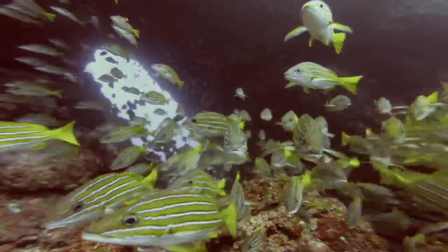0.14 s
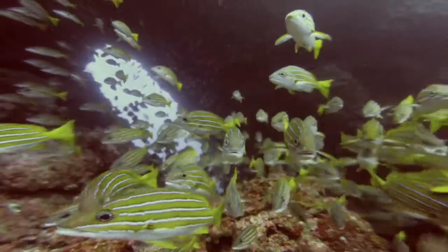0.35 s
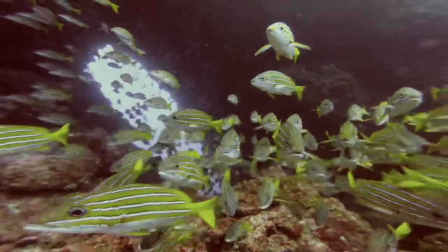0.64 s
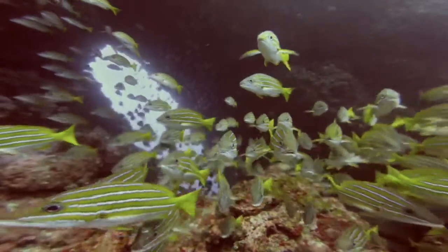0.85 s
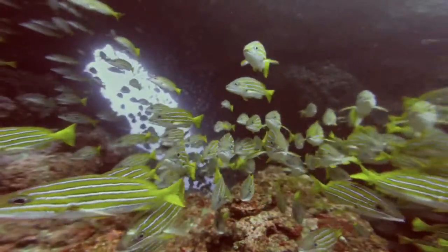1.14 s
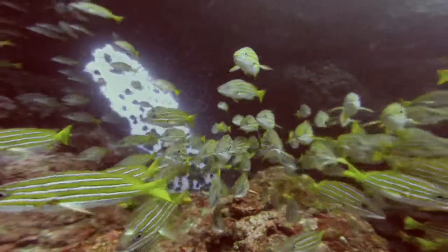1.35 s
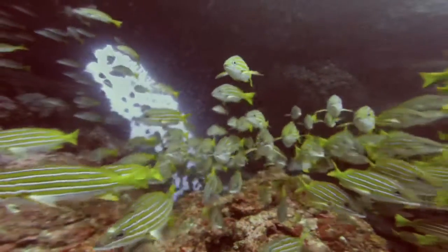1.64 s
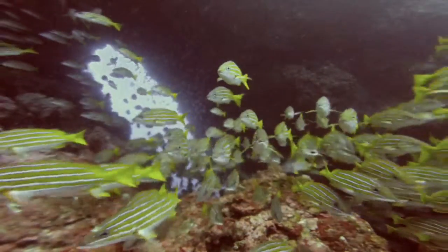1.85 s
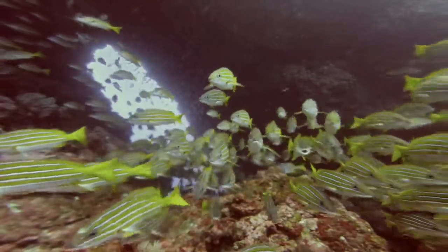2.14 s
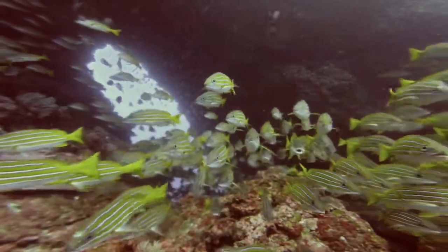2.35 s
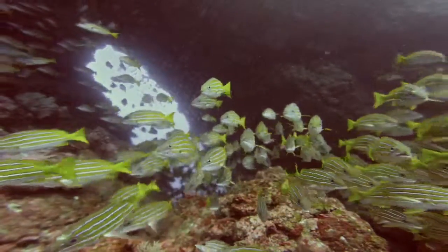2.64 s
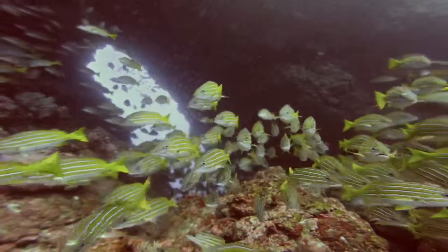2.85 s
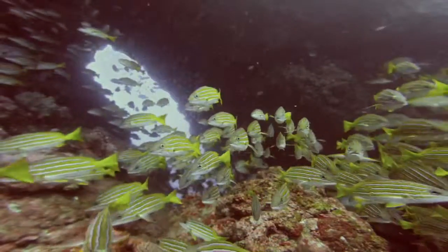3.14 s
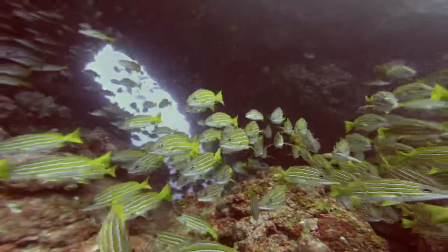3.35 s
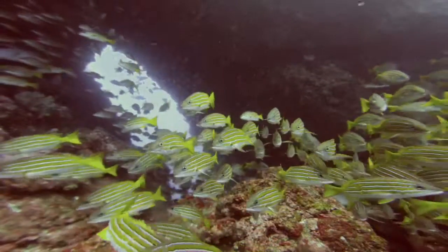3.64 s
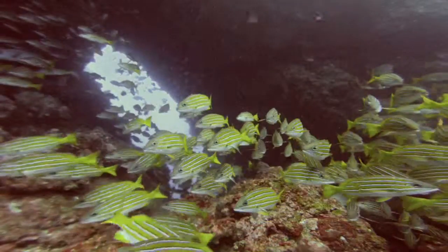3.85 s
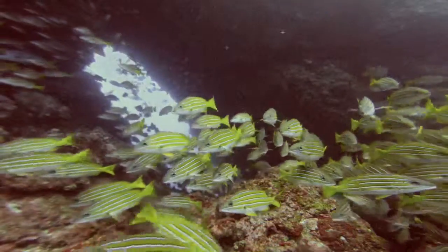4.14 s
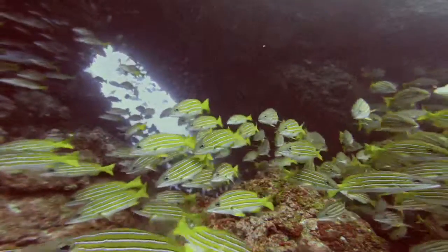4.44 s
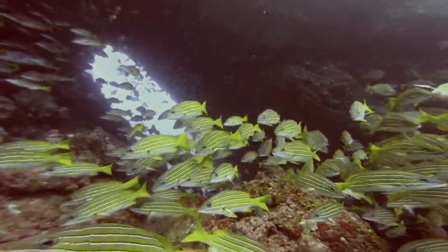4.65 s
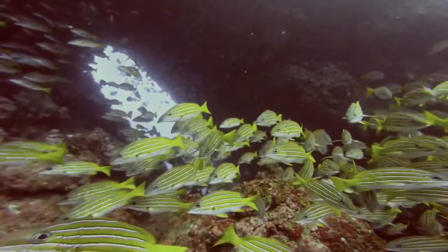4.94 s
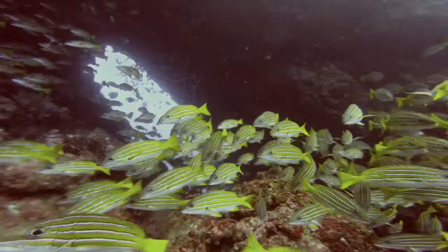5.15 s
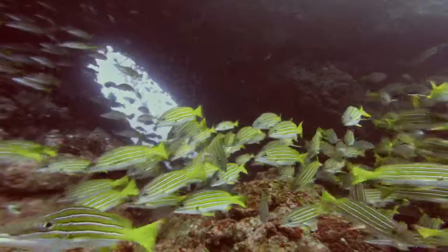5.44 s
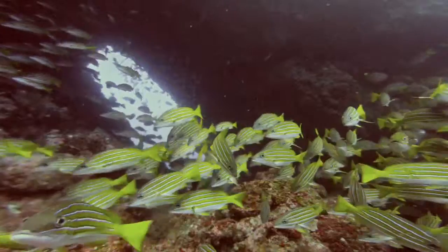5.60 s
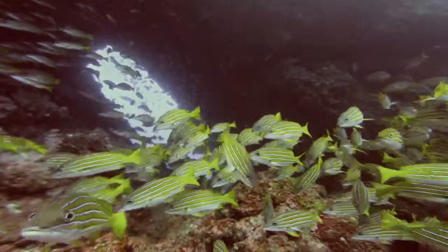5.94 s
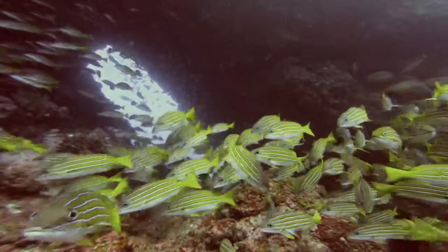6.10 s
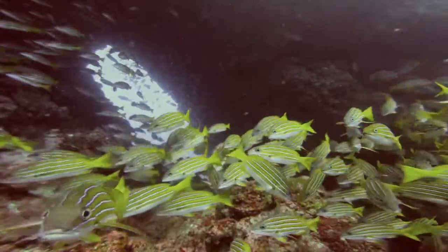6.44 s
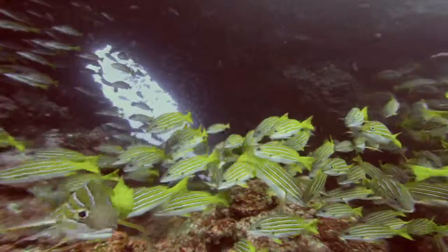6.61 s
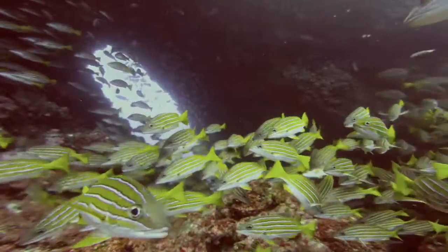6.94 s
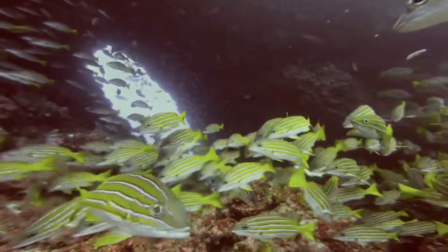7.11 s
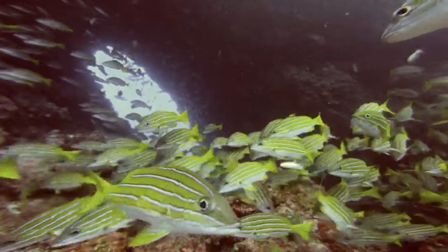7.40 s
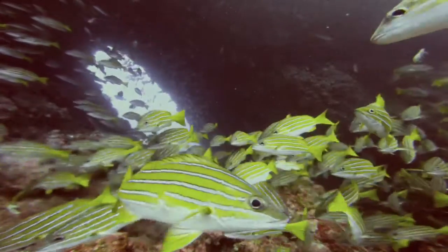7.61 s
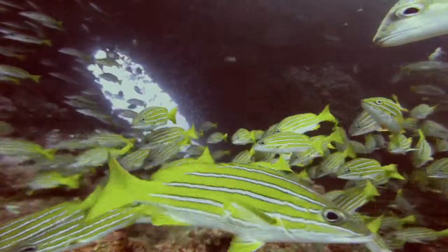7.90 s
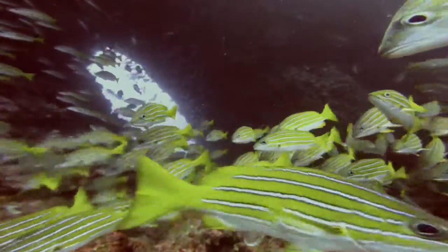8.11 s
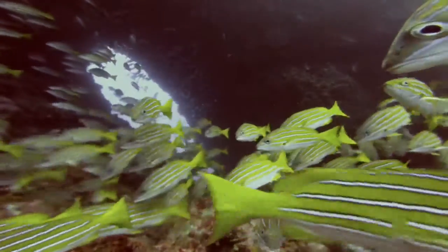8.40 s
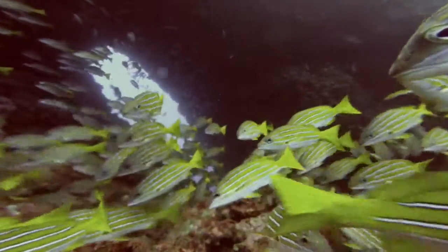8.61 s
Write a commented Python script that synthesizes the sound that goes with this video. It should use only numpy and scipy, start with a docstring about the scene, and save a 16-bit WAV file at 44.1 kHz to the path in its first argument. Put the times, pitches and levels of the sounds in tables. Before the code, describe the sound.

Underwater on a rocky reef amid a school of striped fish, snapping shrimp crackle without pause, near snaps sharp and bright over a fainter, finer far crackle. Dull hollow knocks and tiny low grunts mingle in the first three seconds. A heavy low thump strikes the camera housing just before five seconds, then a cluster of bumps shortly after seven. Close stereo, sealed in a housing, with short rock echoes.

```python
"""A sealed camera housing sits on a reef among a school of fish, heard in stereo.
From the start a faint lumpy hush and short low grunts of filtered noise lie under random far shrimp snaps.
Dull two-pitched knocks and near snaps soon join: noise bursts that ring the housing and echo off the rock.
Slow pushes of water swell as low noise at 0.7 s and 6 s.
Heavy bumps at 4.8 s and from 7.3 s ring the low modes of housing and mount."""
import sys
import numpy as np
from scipy import signal
from scipy.fft import rfft, irfft
from scipy.io import wavfile
from scipy.ndimage import uniform_filter1d

SR = 44100
rng = np.random.default_rng(int(sys.argv[2]) if len(sys.argv) > 2 else 0)


def boost(x):
    """Linear amplitude factor 10**(x/20) for a level x in decibels (scalar or array-like)."""
    u = np.asarray(x, float) / 20
    return 10 ** u


def put_to_file(sound):
    """Save the sound as 16-bit audio at rate SR, in the file named by the first command-line argument."""
    columns = np.atleast_2d(sound).T  # one column per channel
    safe = np.clip(columns, -1, 1)
    whole_steps = np.round(safe * 32767)
    wavfile.write(sys.argv[1], SR, whole_steps.astype(np.int16))


N = 386316  # samples

# colour of the water's hush, relative: f/Hz, level/dB
HUSH_COLOUR = [(165, -7), (500, -28.5), (900, -9), (1500, -24.5)]
# short low grunts: t/s, peak level before the lean to one side/dB, pitch f/Hz
LOW_GRUNTS = [(0, -42, 160), (0.084, -46.5, 274), (0.307, -42, 257), (0.666, -44, 298), (0.912, -38, 172),
              (1.264, -40, 302), (1.569, -44.5, 294), (2.198, -44.5, 304), (2.638, -46, 280)]
# base level of the far snaps, before the answer to near sounds: t/s, level/dB
FAR_LEVEL = [(0.0, -35), (0.799, -36), (2.95, -41.5), (3.499, -36.5), (5.751, -40), (7.299, -39),
             (7.56, -48.5), (7.849, -40.5)]
# dull knocks: t/s, peak level of the ping/dB
DULL_KNOCKS = [(0.074, -29), (0.299, -25.5), (0.597, -40.5), (0.621, -41), (0.656, -23), (0.948, -37),
               (0.975, -10.5), (1.041, -15), (1.151, -37), (1.256, -22), (1.399, -36), (1.56, -24),
               (2.186, -30), (2.217, -24), (2.277, -16.5), (2.34, -33), (2.628, -31), (3.969, -37),
               (4.092, -36), (4.149, -33.5), (5.683, -43.5), (6.377, -44), (6.534, -39.5), (6.857, -39.5),
               (6.881, -39), (6.926, -37.5), (6.95, -39), (7.94, -47.5), (8.136, -45), (8.32, -39)]
# the two pitches of a knock, relative: f/Hz, fall by 60 dB t/s, left level/dB, right level/dB
KNOCK_PITCHES = [(906.4, 0.026, 7.5, -17.5), (1379, 0.011, -5, 0)]
# near shrimp snaps: t/s, peak level/dB, centre of the colour f/Hz
NEAR_SNAPS = [(0.1263, -11.5, 6200), (0.1574, -12, 6460), (0.1901, -7, 4960), (0.241, -11.5, 5530),
              (0.272, -11, 3230.0), (0.2811, -15.5, 7200), (0.3211, -13.5, 2700), (0.3491, -18.5, 2600.0),
              (0.377, -20.5, 7500.0), (0.3901, -8, 3785), (0.4156, -9, 3500.0), (0.4293, -6, 5560.0),
              (0.5043, -4, 2270), (0.5595, -19, 2470), (0.5825, -15, 6700), (0.6367, -27.5, 4400),
              (0.6474, -19.5, 6850), (0.8583, -15, 7400.0), (0.8933, -19.5, 2600.0), (0.9543, -8.5, 7600),
              (0.9923, -10.5, 4670.0), (1.0009, -9, 2520), (1.0218, -13.5, 4440), (1.14, -23, 6300.0),
              (1.157, -6, 4480), (1.1798, -13.5, 1970), (1.2039, -7, 4900.0), (1.272, -1, 2260),
              (1.3207, -4, 4550), (1.3998, -13, 1910), (1.4814, -14.5, 8200), (1.5222, -9, 3010.0),
              (1.5645, -5, 6750), (1.5842, -8, 6200), (1.6227, -17, 8800), (1.6701, -8, 5140),
              (1.6977, -11.5, 2990), (1.716, -12.5, 6000.0), (1.7518, -4.5, 2990.0), (1.7597, -9, 7500),
              (1.8108, -19, 5370), (1.8705, -17.5, 7300), (1.9015, -7, 4420), (1.95, -3, 2840),
              (1.9793, -16.5, 2590), (2.005, -10, 3750.0), (2.0226, -11, 3540.0), (2.078, -7, 5870),
              (2.151, -27, 8150.0), (2.2363, -14.5, 4800), (2.2631, -3.5, 2615), (2.2758, -5.5, 2180),
              (2.287, -7.5, 5330), (2.353, -9, 7830.0), (2.3652, -7.5, 3100), (2.4194, -17.5, 3630),
              (2.5182, -11.5, 7200), (2.5758, -13, 3810.0), (2.5893, -4.5, 3400.0), (2.6098, -6.5, 6140.0),
              (2.6543, -6.5, 2940), (2.7158, -20, 3200), (2.8236, -13.5, 7700), (2.8556, -12, 9050),
              (3.025, -12, 3230), (3.0432, -15.5, 5700), (3.0989, -21.5, 6200.0), (3.111, -5.5, 2680.0),
              (3.1264, -6.5, 5650), (3.164, -13.5, 5730), (3.1843, -9.5, 4580.0), (3.194, -3.5, 2980.0),
              (3.2109, -8, 6100), (3.256, -5.5, 3200), (3.2824, -1, 2750), (3.3971, -12, 4550),
              (3.4046, -12.5, 7800), (3.4604, -11, 7200), (3.538, -12, 6350.0), (3.577, -8, 3800.0),
              (3.6065, -12.5, 6800), (3.6265, -5, 4270.0), (3.6985, -16, 7500), (3.7234, -6, 4830),
              (3.7883, -17, 5000.0), (3.8594, -2, 2386), (3.8985, -20, 2550), (3.9105, -13, 7900),
              (3.939, -9, 3900), (3.9898, -6.5, 4520), (4.027, -20, 7700), (4.038, -9, 4570),
              (4.1068, -14.5, 7800), (4.1144, -17.5, 7500), (4.2338, -16.5, 6500), (4.3007, -18, 4720),
              (4.349, -14.5, 6600), (4.3626, -11.5, 8700), (4.374, -1.5, 3400.0), (4.389, -11, 2650),
              (4.4296, -17.5, 6060), (4.4376, -8, 3540), (4.4695, -3, 3060), (4.544, -13.5, 6500),
              (4.6909, -21, 2570.0), (4.715, -9.5, 6490.0), (4.938, -15, 8000), (4.9699, -3.5, 2680.0),
              (5.1146, -17, 3080), (5.135, -8, 4300.0), (5.1634, -14, 6920.0), (5.1825, -17, 2960.0),
              (5.194, -13.5, 2990.0), (5.2358, -7, 3630), (5.2537, -11.5, 4320.0), (5.305, -19, 6160.0),
              (5.3709, -16.5, 2800), (5.4231, -4, 3770), (5.4392, -15.5, 3470), (5.4967, -18.5, 6030),
              (5.5512, -14.5, 7310.0), (5.566, -7.5, 6650), (5.5871, -13.5, 6140), (5.6241, -5, 3530),
              (5.834, -15.5, 4300), (5.8625, -13.5, 5600), (5.8739, -2, 3950), (5.9338, -23.5, 3300.0),
              (5.9502, -11, 8380.0), (6.0257, -11.5, 4050), (6.069, -16, 5200), (6.106, -21, 3080),
              (6.174, -2.5, 2590), (6.2009, -4, 3060), (6.2635, -3, 4400), (6.2955, -9.5, 3100),
              (6.4079, -19, 3120), (6.4312, -9, 4330.0), (6.4423, -8.5, 3770), (6.5069, -7, 4990.0),
              (6.5345, -15, 8800), (6.5542, -5.5, 2580), (6.6267, -14, 6000), (6.6725, -4, 2560),
              (6.7273, -15, 2580), (6.8671, -9, 3780), (6.95, -13.5, 4660), (7.0312, -14, 6940.0),
              (7.0389, -13.5, 4130), (7.0646, -5.5, 3230), (7.084, -10, 3000.0), (7.1126, -10, 3090),
              (7.153, -13.5, 7000), (7.173, 0, 2680), (7.23, -18, 4500.0), (7.2481, -9.5, 3270.0),
              (7.2684, -2.5, 2920), (7.2863, -8.5, 8270), (7.339, -7.5, 6250), (7.3658, -13.5, 2230),
              (7.4206, -15, 3274), (7.6499, -18.5, 3250), (7.6764, -20.5, 3045), (7.75, -19, 7310),
              (7.9248, -6, 4600), (7.942, -16, 6160), (8.0637, -15, 2260), (8.1508, -21, 5900),
              (8.2127, -16, 8500), (8.2503, -2, 3870), (8.2988, -9.5, 3080), (8.3273, -16, 6240),
              (8.4014, -12, 7800), (8.4087, -11, 6860), (8.5235, -7.5, 4500.0), (8.5615, -11, 2520),
              (8.571, -15.5, 5090.0), (8.6278, -19, 2640), (8.6429, -2, 2830), (8.6646, -9.5, 6730.0)]
# housing resonances at the two microphones, relative: f/Hz, width f/Hz, left level/dB, right level/dB
HOUSING_MODES = [(1384, 210, 3.5, -7), (1941, 406, 4.5, 7.5), (2205, 190, 6, 2.5), (2905, 486, 2.5, 8.5),
                 (3400, 260, 8.5, -16.5), (3944, 1000, -27, -0.5), (6415, 1700, 17, 15.5),
                 (7710, 590, -30, 17), (8843, 1330, -4.5, 16.5), (11340, 4100, -4.5, -42.5)]
# balance of a snap's body, sizzle and top: level/dB
SNAP_RANGES = [-1, 3, -3]
# slow pushes of water from passing fish: start t/s, length t/s, peak level/dB
WATER_PUSHES = [(0.686, 0.25, -43), (6.004, 0.22, -44.5)]
# blows on the housing: t/s, peak level of the ring/dB, hardness as level per octave above 150 Hz/dB
HOUSING_BUMPS = [(4.785, 3, -1), (7.3, 4.5, 3), (7.473, 1.5, 1), (7.555, -4, 2)]
# low modes of housing and mount, relative: f/Hz, right level/dB, fall by 60 dB t/s, left as signed factor on right
MOUNT_MODES = [(41.6, -15.5, 0.93, 0.8), (96.5, -2, 0.48, 0.7), (131.4, 7.5, 0.36, 0.23),
               (185.2, 10.5, 0.15, 0.36), (227.6, 10.5, 0.14, 0.14), (294, -6, 0.2, 0.6),
               (416, 7, 0.084, -0.073)]

HUSH_DB = -72  # before the lumps
LEAD_S = 0.004  # faint hiss before a snap
CRACK_DB = 5  # first instant of a snap against its burst
NEAR_HOLD_S, FAR_HOLD_S = 0.0013, 0.0027  # typical burst length
OCTAVE_DB = -1.5  # fall one breadth away from the pitch
NEAR_SKIRT_DB, FAR_SKIRT_DB = -19.5, -34  # deepest fall away from the pitch
BROAD_HZ, NARROW_OCT, BROAD_OCT, BROAD_SPAN_OCT = 4300, 0.24, 0.45, 1  # mid-band colours are the broad ones
FAR_LOW_HZ, FAR_HIGH_HZ, FAR_BREADTH_OCT, FAR_PER_S = 1700, 11000, (0.25, 0.75), 120
ANSWER_DB, ANSWER_S = 0.28, 0.014  # dB of far snaps per dB of near sound, and how long the answer lasts
SPREAD_S = 0.04  # time over which a far snap's level is counted
UPPER_DB, UPPER_SLOPE = 21, 0.47  # upper ping of a knock: boost in dB, plus dB per dB of the knock
GRIT_DB = -13.5  # scrape against the ping
DENSE_S = 0.055  # the dense part of the echo tail drops away about then
TOUCH_S, TOUCH_DB = 0.012, -21  # soft contact ahead of a blow
FADE_S = 0.3  # the last of a ring fades faster and faster, the lowest modes least


def evened(x):
    """Scales a sound to an rms of 1."""
    return x / np.sqrt(np.mean(x ** 2) + 1e-20)


def add(mix, s, sound):
    """Lays a sound into the mix at s seconds, cut off at the end."""
    part = mix[:, max(round(s * SR), 0):][:, :sound.shape[1]]
    part += sound[:, :part.shape[1]]


def band_noise(noise, order, low_hz, high_hz):
    """Keeps one band of a noise."""
    return signal.lfilter(*signal.butter(order, [low_hz, high_hz], "band", fs=SR), noise)


def coloured(gain_at):
    """Two unrelated noises whose spectrum follows gain_at(Hz)."""
    spectrum = rfft(rng.standard_normal((2, N)))
    return evened(irfft(spectrum * gain_at(np.fft.rfftfreq(N, 1 / SR)), N))


def hush():
    """Faint wide noise of the water, its level drifting in lumps."""
    f, db = np.transpose(HUSH_COLOUR)
    lumps = boost(5.6 * coloured(lambda hz: 1 / (1 + (hz / 8) ** 2))[0])
    noise = coloured(lambda hz: boost(np.interp(np.log(hz + 1), np.log(f), db, -100, -100)))
    return boost(HUSH_DB) * lumps * noise


def grunts():
    """Decaying noise in a narrow low band, a few cycles long; the higher ones lean right."""
    out, t = np.zeros((2, N)), np.arange(8000) / SR
    for s, db, hz in LOW_GRUNTS:
        envelope = (1 - np.exp(-t * hz)) * boost(-60 * t / (0.086 + 4 / hz))
        low = band_noise(rng.standard_normal(len(t)) * envelope, 2, 0.61 * hz, 1.19 * hz)
        lean = boost(np.array([[-0.04], [0.015]]) * hz)
        add(out, s, boost(db) * low / abs(low).max() * lean)
    return out


def causal(db):
    """A minimum-phase filter with this gain over frequency: it rings only after the blow."""
    fold = irfft(db * np.log(10) / 20)
    half = fold.shape[-1] // 2
    fold = fold * np.r_[1, np.full(half - 1, 2), 1, np.zeros(half - 1)]
    return np.exp(rfft(fold))


def peak(x):
    """Size of a sound: the highest point of the envelope power averaged over both channels, as a level."""
    return np.sqrt((abs(signal.hilbert(x)) ** 2).mean(-2).max(-1))[..., None, None]


def housing(size):
    """Causal resonances at both microphones, in three ranges; the body reaches the left one late."""
    hz = abs(np.fft.fftfreq(size, 1 / SR))
    power = 0
    for f, width, left_db, right_db in HOUSING_MODES:
        power = power + boost(np.array([[left_db], [right_db]])) ** 2 / (1 + (2 * (hz - f) / width) ** 2) ** 2
    log_gain = np.log(power / (1 + (700 / (hz + 1)) ** 6)) / 2  # thins out below 700 Hz
    response = np.exp(log_gain - 1j * signal.hilbert(log_gain).imag)[:, :size // 2 + 1]
    hz = hz[:size // 2 + 1]
    body = 1 / (1 + (hz / 4700) ** 14)
    top = 1 - 1 / (1 + (hz / 7200) ** 18)
    sizzle = 1 - body - top
    late = np.exp(-2j * np.pi * hz * np.array([[0.00043], [0]]))
    flipped = np.array([[-1], [1]])  # the sizzle moves the microphones in opposite senses
    return response * body * late, response * sizzle * flipped, response * top


def cracks(count, hold_s, size=2048):
    """Collapsing bubbles: a crack and a short ragged burst through the housing; each range at peak 1."""
    t = np.arange(size) / SR - LEAD_S
    shared = rng.standard_normal((count, 1, size))
    own = rng.standard_normal((count, 2, size))
    hold = hold_s * boost(3.46 * rng.standard_normal((count, 1, 1)))
    # the closing claw hisses faintly before the bubble bursts
    rise = boost(-22 + 14000 * np.minimum(t, 0)) * (t < 0)
    burst = boost(-60 * np.maximum(t - hold, 0) / 0.005) + boost(-11 - 60 * t / 0.026)
    shape = rise + (t >= 0) * burst
    crack = boost(CRACK_DB) * (np.arange(size) == round(LEAD_S * SR))
    # each path through rock and water favours other pitches
    ripple_db = 5.1 * evened(uniform_filter1d(rng.standard_normal((count, 1, size // 2 + 1)), 45))
    # the highest treble varies in level from snap to snap
    ripple_db[..., size // 4 - 40:] += 1.5 + 4 * rng.standard_normal((count, 1, 1))
    path = causal(ripple_db)
    ranges = []
    for response, own_share in zip(housing(size), (0.5, 0.7, 1.6)):
        source = crack + shape * (shared + own_share * own)
        part = irfft(rfft(source) * response * path)
        ranges.append(part / peak(part))
    return np.stack(ranges, axis=1)


def pitched(hz, breadth, skirt_db, hold_s):
    """Snaps of peak 1, each filtered to favour its own pitch and fall away to both sides."""
    whole = np.einsum("r,krct->kct", boost(np.array(SNAP_RANGES)), cracks(len(hz), hold_s))
    bins_hz = np.fft.rfftfreq(whole.shape[-1], 1 / SR) + 1
    octaves = np.log2(bins_hz / hz[:, None, None])
    breadths_away = octaves / np.maximum(breadth, 0.2)[:, None, None]
    snaps = irfft(rfft(whole) * causal(np.maximum(OCTAVE_DB * breadths_away ** 2, skirt_db)))
    return snaps / peak(snaps)


def far_shrimp(near, count=44):
    """Fainter bubble bursts at random moments; they crowd in after near sounds and thin out in the pauses."""
    keep = np.exp(-1 / (ANSWER_S * SR))
    near_power = signal.lfilter([1 - keep], [1, -keep], (near ** 2).mean(0))
    busy_db = 10 * np.log10(near_power + 1e-6)
    level_db = np.interp(np.arange(N) / SR, *np.transpose(FAR_LEVEL)) + ANSWER_DB * busy_db
    spread_db = 2.64 * np.minimum(rng.exponential(1, N), 2.4)
    size = boost(level_db + spread_db) * (rng.random(N) < FAR_PER_S / SR)
    kind = rng.integers(0, count, N)
    high, wide = rng.random((count, 2)).T
    hz = FAR_LOW_HZ * (FAR_HIGH_HZ / FAR_LOW_HZ) ** high ** 0.73
    shapes = pitched(hz, np.interp(wide, (0, 1), FAR_BREADTH_OCT), FAR_SKIRT_DB, FAR_HOLD_S)
    far = np.zeros((2, N))
    for k in range(count):
        far += signal.oaconvolve((size * (kind == k))[None], shapes[k])[:, :N]
    return far * np.sqrt((size ** 2).sum() * SPREAD_S * SR / (far ** 2).sum())


def rock(x):
    """Scattered echoes from the reef walls, the treble dying sooner; a low rustle lingers."""
    t = np.arange(9000) / SR
    taps = rng.standard_normal((2, len(t))) * (rng.random((2, len(t))) < 0.2)  # sparse reflections
    taps = taps * (1 - np.exp(-t / 0.0008))
    dull = signal.lfilter(*signal.butter(2, 4800, fs=SR), taps)
    bright = taps - dull
    dense = np.exp(-(t / DENSE_S) ** 4)
    tail = dull * boost(-60 * t / 0.25) * (dense + boost(-29.5))
    tail = tail + bright * boost(-60 * t / 0.11) * (dense + boost(-31.5))
    rustle = signal.lfilter(*signal.butter(2, 2400, fs=SR), taps)
    tail = tail + rustle * boost(-9 - 60 * t / 0.5)
    return signal.oaconvolve(x, tail / np.linalg.norm(tail[0]), axes=1)[:, :N]


def knocks():
    """Soft, short pings of two decaying sines that differ a little each time, over a rough noise scrape."""
    t, out = np.arange(2000) / SR, np.zeros((2, N))
    scrapes = evened(band_noise(rng.standard_normal((len(DULL_KNOCKS), 2, len(t))), 2, 650, 1600))
    for (s, db), scrape in zip(DULL_KNOCKS, scrapes):
        detune = 1 + 0.032 * rng.standard_normal(2)
        gains = 1, boost(UPPER_DB + UPPER_SLOPE * db)
        ping = 0
        for gain, d, (hz, t60, left_db, right_db) in zip(gains, detune, KNOCK_PITCHES):
            decay = boost(np.array([[left_db], [right_db]]) - 60 * t / t60)
            ping = ping + gain * decay * np.sin(2 * np.pi * hz * d * t)
        ping = ping * (1 - np.exp(-(t / 0.0025) ** 2))
        grit = boost(GRIT_DB - 60 * t / 0.098) * scrape * (1 - np.exp(-t / 0.0031))
        add(out, s, boost(db) * (ping / abs(ping.mean(0)).max() + grit))
    return out


def near_shrimp():
    """Every listed snap is a bubble burst of its own, ringing the housing."""
    out = np.zeros((2, N))
    s, db, hz = np.transpose(NEAR_SNAPS)
    off_centre = np.log2(hz / BROAD_HZ) / BROAD_SPAN_OCT
    breadth = NARROW_OCT + BROAD_OCT * np.exp(-off_centre ** 2)
    for at, gain, snap in zip(s, boost(db), pitched(hz, breadth, NEAR_SKIRT_DB, NEAR_HOLD_S)):
        add(out, at - LEAD_S, gain * snap)
    return out


def pushes():
    """Water pushed by passing fish: a lumpy swell of two low noise bands."""
    out = np.zeros((2, N))
    for s, length, db in WATER_PUSHES:
        size = round(length * SR)
        noise = rng.standard_normal((2, SR // 2))
        noise = noise[0] + 1.7 * noise  # the sides are partly alike
        deep = evened(band_noise(noise, 2, 25, 65))
        upper = evened(band_noise(noise, 2, 110, 230))
        low = (deep + boost(-11) * upper)[:, -size:] * np.hanning(size)
        add(out, s, boost(db) * low / abs(low).max())
    return out


def bumps():
    """Each blow rings the same low modes after a soft touch; a harder blow drives the upper ones more."""
    t, out = np.arange(SR // 2) / SR, np.zeros((2, N))
    touch_shape = np.sin(2 * np.pi * 130 * t) * (t / TOUCH_S) * np.exp(-(t / TOUCH_S) ** 2)
    touch = np.array([[0.4], [1]]) * touch_shape
    for s, db, hard_db in HOUSING_BUMPS:
        turns = rng.standard_normal(len(MOUNT_MODES))
        # the water rocks the mount, so each mode wavers
        sway = uniform_filter1d(rng.standard_normal((len(MOUNT_MODES), len(t))), 900)
        sway = evened(uniform_filter1d(sway, 900))
        ring = 0
        for (hz, mode_db, t60, left), turn, waver in zip(MOUNT_MODES, turns, sway):
            level_db = mode_db + hard_db * np.log2(hz / 150) - 60 * t / t60
            level_db = level_db + 3.9 * np.minimum(t / 0.093, 1) * waver
            level_db = level_db - hz / 15 * (t / FADE_S) ** 4
            tone = np.cos(2 * np.pi * hz * (t - 0.011) + 0.12 * turn)
            ring = ring + np.array([[left], [1]]) * boost(level_db) * tone
        thud = band_noise(rng.standard_normal((2, len(t))), 3, 160, 850)
        rumble_band = signal.butter(2, [28, 120], "band", fs=SR, output="sos")
        rumble = evened(signal.sosfilt(rumble_band, rng.standard_normal(len(t))))
        blow = ring / abs(ring).max()
        blow = blow + boost(-14 - 60 * t / 0.13) * thud + boost(-36 - 60 * t / 0.52) * rumble
        add(out, s - TOUCH_S, boost(db + TOUCH_DB) * touch)
        add(out, s, boost(db) * blow * (1 - np.exp(-(t / 0.0038) ** 3)))
    return out


def scene():
    """Mixes all layers; rock echoes follow the snaps and knocks."""
    near = near_shrimp() + knocks()
    far = far_shrimp(near)
    echoes = rock(boost(-16.5) * near + boost(-10.5) * far)
    return hush() + grunts() + far + near + echoes + pushes() + bumps()


def roll_off(x):
    """The treble ends steeply here."""
    return signal.sosfilt(signal.butter(12, 16650, fs=SR, output="sos"), x)


def record(dry):
    """The preamplifier bends the loudest peaks, saturating smoothly towards full scale."""
    bent = dry / np.sqrt(np.sqrt(1 + dry ** 4))
    return roll_off(bent)


dry = scene()
out = record(dry)
put_to_file(out)
```